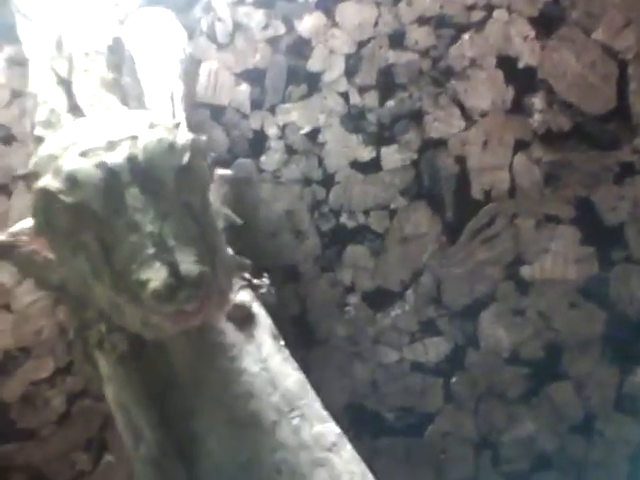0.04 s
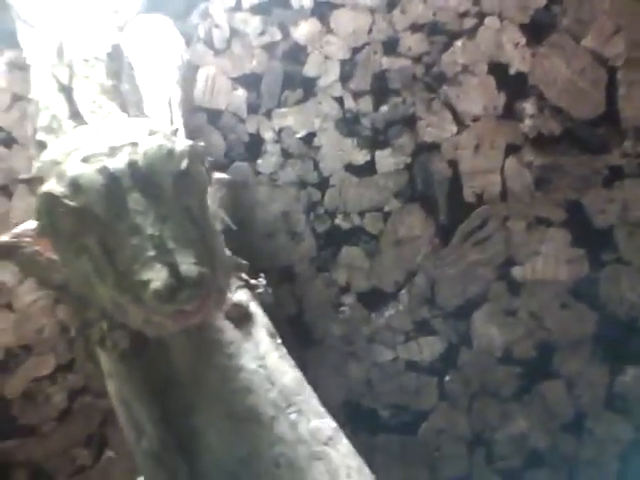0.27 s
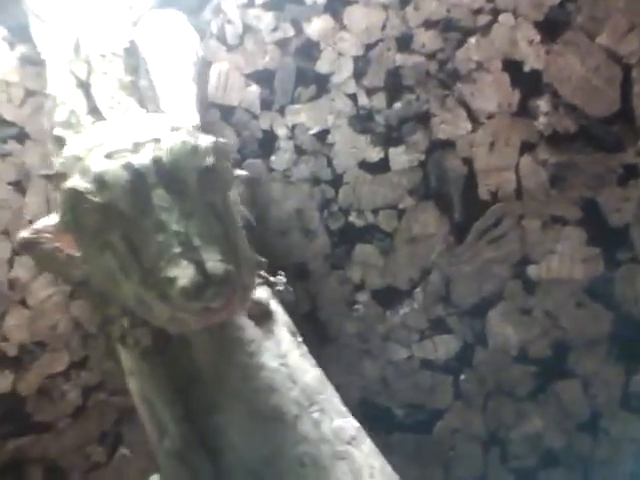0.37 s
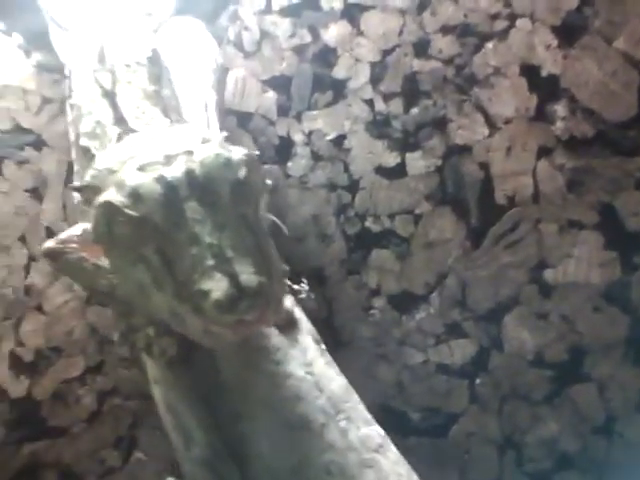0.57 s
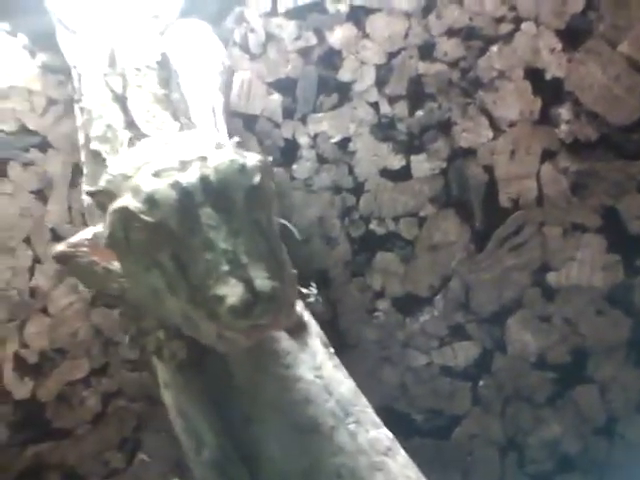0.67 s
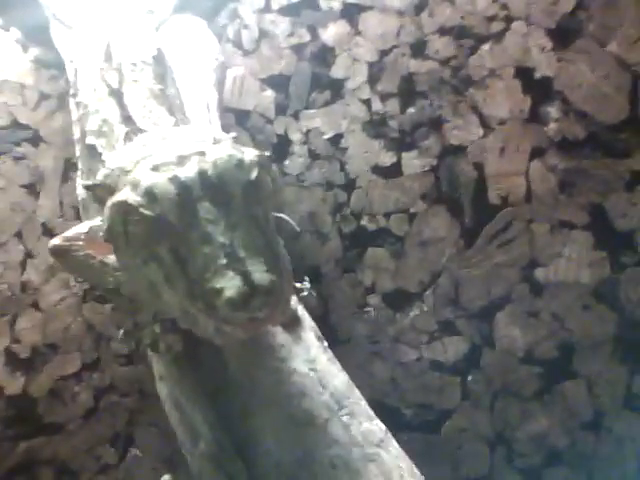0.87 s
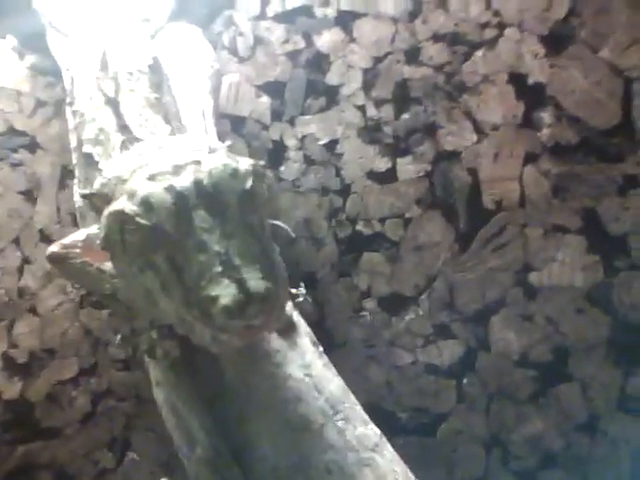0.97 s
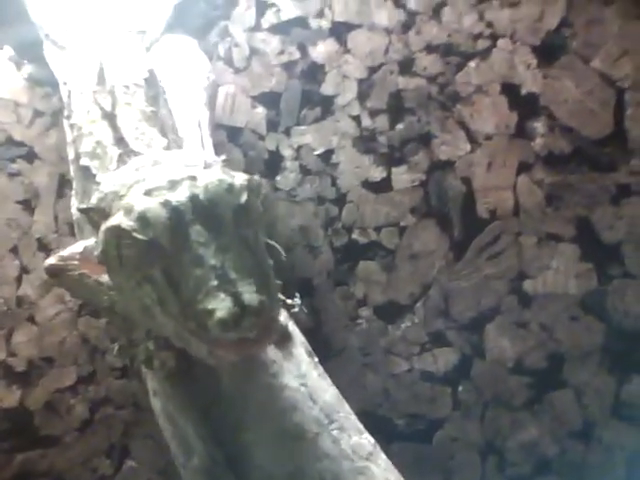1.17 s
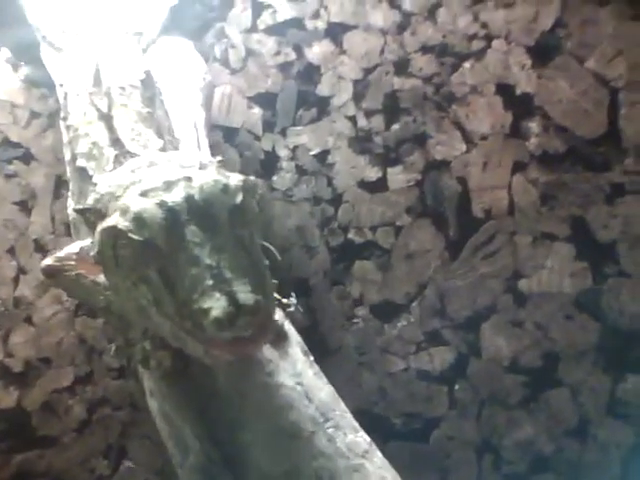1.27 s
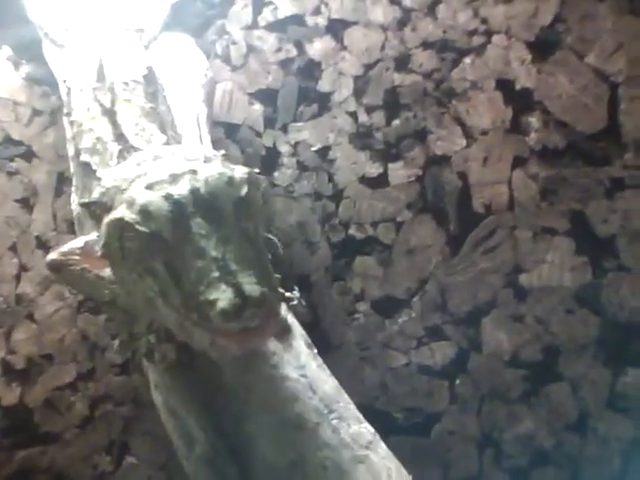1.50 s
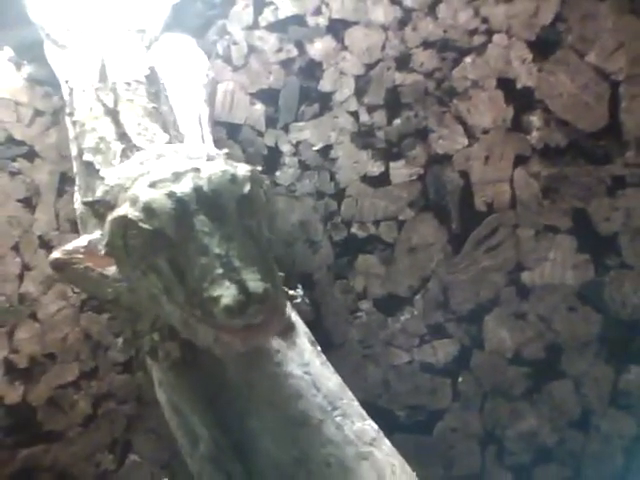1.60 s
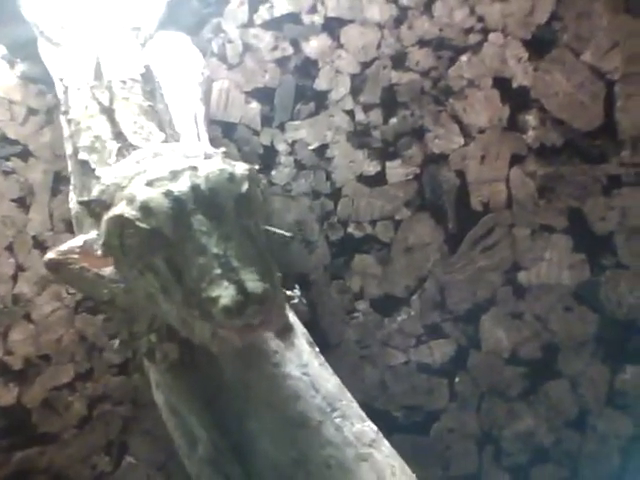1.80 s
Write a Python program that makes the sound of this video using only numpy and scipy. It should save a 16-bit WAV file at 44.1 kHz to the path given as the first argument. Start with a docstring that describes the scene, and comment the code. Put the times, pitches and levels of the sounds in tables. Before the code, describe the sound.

A gecko crunches its prey close to the microphone: one sharp crack, faint crackly chewing, then a softer crack and a tiny last click. Quiet hiss and low rumble fill the room behind it.

```python
"""Indoors, close to a small mono microphone, a gecko bites down on its prey.
The prey's shell breaks with one sharp crack, later a softer one and a faint last one.
Each snap rings briefly at one pitch. In between, chewing makes tiny breaks that crackle.
Behind it are hiss, low room rumble, a thin electrical whine, one soft bump
and a low drone that swells late."""
import sys
import numpy as np
from scipy import signal
from scipy.fft import rfft, irfft
from scipy.io import wavfile
from scipy.ndimage import uniform_filter1d

SR = 44100
rng = np.random.default_rng(int(sys.argv[2]) if len(sys.argv) > 2 else 0)


def wrap_up_sound(samples):
    """Save the sound to the file named by the first command line argument, as 16-bit audio."""
    columns = np.atleast_2d(samples).T
    # keep every value between -1 and 1, then stretch to whole-number steps
    tamed = np.clip(columns, -1, 1)
    steps = np.round(tamed * 32767).astype(np.int16)
    wavfile.write(sys.argv[1], SR, steps)


N = 81585

# Tone colour of the room's rumble and hiss: f/Hz, relative level/dB
ROOM_COLOUR = [(15, -20), (25, -37), (37, 3.5), (59, -3.5), (86, -3.5), (113, -5.5), (157, -5), (189, -9.5),
               (222, -14), (307, -11.5), (352, -10), (449, -11.5), (486, -14), (527, -14), (710, -16.5),
               (1040, -13), (1150, -16.5), (1390, -14), (1640, -21), (1780, -19.5), (2090, -21.5),
               (3390, -18.5), (5820, -24.5), (11700, -25.5), (15800, -27)]
# Low pitches at which the room rings: f/Hz, width/Hz, level/dB
ROOM_RESONANCES = [(163.8, 33, -69), (350.8, 66, -70.5), (405.7, 35, -73.5)]
# Narrow bands of electrical whine: f/Hz, width/Hz, level/dB
WHINE_BANDS = [(12166, 3, -81), (12170, 90, -79), (15223, 4, -78)]
# How the drone's main tone swells: t/s, level/dB
DRONE_SWELL = [(0, -77.5), (.3, -68), (.7, -68), (.88, -62.5), (1.05, -61), (1.17, -68), (1.25, -58.5),
               (1.38, -55.5), (1.46, -60.5), (1.58, -53), (1.7, -58.5), (1.85, -56)]
# How the drone's pitch rises: t/s, f/Hz
DRONE_RISE = [(0, 87), (1.2, 88), (1.6, 89.5), (1.85, 93)]
# Tone colour shared by all breaks of the shell: f/Hz, relative level/dB
SHELL_COLOUR = [(300, -11), (700, -18), (1000, -4), (1220, -3.5), (1550, 4.5), (2050, 1), (3100, 1),
                (4200, -1.5), (5200, -4), (5750, -9.5), (6500, -9.5), (8000, -15.5), (11000, -14),
                (16000, -25)]
# Bursts of chewing: middle t/s, half length/s, force level/dB
CHEW_BURSTS = [(.358, .03, -23), (0.622, .045, -28)]
# Snaps of the shell: t/s, force level/dB, low edge f/Hz, break time/ms, ring f/Hz, ring boost/dB
SHELL_SNAPS = [(.2150, 9, 480, 0.086, 1405, 12), (1.2447, -2, 1820, 0.18, 1380, 10),
               (1.6143, -19, 1900, .24, 2200, 12)]


def undb(db):
    """Turn decibels into a number to multiply by."""
    return 10 ** (np.asarray(db) / 20)


def colour(points, hz):
    """Gain at each frequency, from a line drawn through (f/Hz, level/dB) points."""
    point_hz, db = np.array(points, float).T
    return undb(np.interp(np.log(hz + 1e-3), np.log(point_hz), db))


def resonance(hz, centre, width):
    """How something that rings answers each frequency: most strongly at its centre."""
    return 1j * hz * width / (centre ** 2 - hz ** 2 + 1j * hz * width)


def noise(gain, db):
    """Noise with the given tone colour and average (rms) level."""
    shaped = irfft(rfft(rng.standard_normal(N)) * gain, N)
    return shaped * undb(db) / np.sqrt(np.mean(shaped ** 2))


def wander(per_s):
    """A smooth random wobble, mostly between -1 and 1."""
    hold = int(SR / per_s)
    steps = np.repeat(rng.standard_normal(N // hold + 1), hold)
    return 1.3 * uniform_filter1d(uniform_filter1d(steps, hold), hold)[:N]


def pass_filter(x, hz, kind, order):
    """Let the "high" or "low" side of hz through; a higher order cuts more steeply."""
    return signal.sosfilt(signal.butter(order, hz, kind, fs=SR, output="sos"), x)


def band(x, low_hz, high_hz):
    """Keep the sound between two frequencies."""
    without_lows = pass_filter(x, low_hz, "high", order=3)
    return pass_filter(without_lows, high_hz, "low", order=2)


def background():
    """Steady rumble and hiss, the room's low ringing and the electrical whine."""
    hz = np.arange(N // 2 + 1) * SR / N
    out = noise(colour(ROOM_COLOUR, hz), db=-54.5)
    for centre, width, db in ROOM_RESONANCES + WHINE_BANDS:
        out += noise(resonance(hz, centre, width) ** 2, db)  # squaring narrows the band
    return out


def drone(waver_db=1, octave_db=-14.5):
    """A low wavering tone and the octave above it, swelling and rising a little."""
    t = np.arange(N) / SR
    pitch_hz = np.interp(t, *np.array(DRONE_RISE).T) * (1 + .015 * wander(16))
    phase = 2 * np.pi * np.cumsum(pitch_hz) / SR
    gain = undb(np.interp(t, *np.array(DRONE_SWELL).T) + waver_db * wander(16.5))
    octave = undb(octave_db + 3 * wander(12)) * np.sin(2 * phase)
    return gain * (np.sin(phase) + octave) * np.sqrt(2)


def bump(middle_s=.565, fade_s=.021, hz=129, db=-53.5):
    """A few low waves that swell and fade, like a hand shifting."""
    t = np.arange(N) / SR - middle_s
    return undb(db) * np.exp(-(t / fade_s) ** 2) * np.sin(2 * np.pi * hz * t)


def add_reflections(x, db=-17, fade_s=.022, size=2048):
    """Things close by bounce a little sound back; it falls 60 dB in fade_s."""
    tail = rng.standard_normal(size) * np.exp(-np.log(1000) * np.arange(size) / SR / fade_s)
    tail = band(tail / np.linalg.norm(tail), low_hz=2190, high_hz=5460)
    return x + undb(db) * signal.fftconvolve(x, tail)[:N]


def shell_click(ring_hz, ring_db, break_ms, ring_s=.028, size=4096):
    """One break of the shell: a slower break sounds duller, and its ring falls 60 dB in ring_s."""
    hz = np.arange(size // 2 + 1) * SR / size
    push = np.hypot(np.sinc(hz * break_ms / 1000), .05)
    # Give the click this colour with no sound before the break (minimum phase).
    cepstrum = irfft(np.log(colour(SHELL_COLOUR, hz) * push))
    cepstrum[1:size // 2] *= 2
    cepstrum[size // 2 + 1:] = 0
    click = np.exp(rfft(cepstrum))
    ring = 1 + (undb(ring_db) - 1) * resonance(hz, ring_hz, width=np.log(1000) / np.pi / ring_s)
    treble_dip = 1 + (undb(-37) - 1) * resonance(hz, centre=3490, width=740)
    return irfft(click * ring * treble_dip)


def chewing(peak_breaks_per_s=540):
    """Chewing makes bursts of tiny breaks, most crowded in the middle of each burst."""
    force = np.zeros(N)
    for middle_s, half_s, db in CHEW_BURSTS:
        later, earlier, strength = rng.random((int(half_s * peak_breaks_per_s), 3)).T
        times = middle_s + half_s * (later - earlier)
        np.add.at(force, (times * SR).astype(int), undb(db) * (2 * strength - 1))
    force = band(force, low_hz=1400, high_hz=2150)
    return signal.fftconvolve(force, shell_click(ring_hz=1770, ring_db=6, break_ms=.055))[:N]


def snaps():
    """The shell gives way under the bite; each snap has its own brightness and ring."""
    out = np.zeros(N)
    for start_s, db, low_hz, break_ms, ring_hz, ring_db in SHELL_SNAPS:
        jolt = undb(db) * signal.unit_impulse(N, int(start_s * SR))
        force = pass_filter(jolt, low_hz, "high", order=3)
        out -= signal.fftconvolve(force, shell_click(ring_hz, ring_db, break_ms))[:N]
    return out


def scene():
    """The room and the bite together, the same on both channels."""
    mono = background() + drone() + bump() + add_reflections(snaps() + chewing())
    return np.array([mono, mono])


def record(dry, top_hz=15750):
    """The recorder cuts off the highest treble."""
    return signal.sosfilt(signal.ellip(12, .1, 70, top_hz, fs=SR, output="sos"), dry)


dry = scene()
out = record(dry)
wrap_up_sound(out)
```